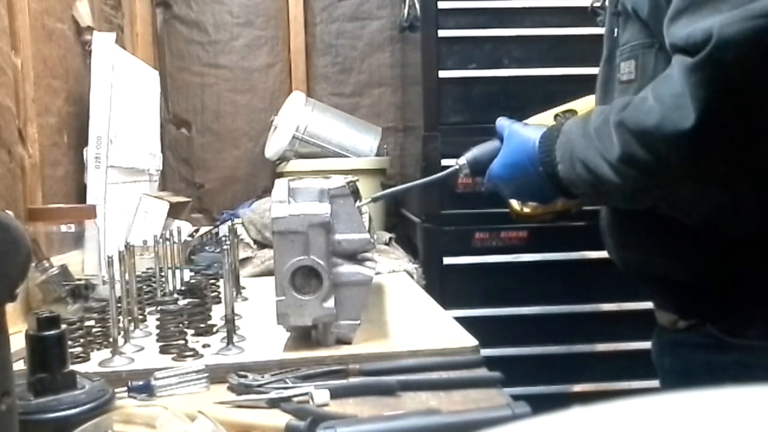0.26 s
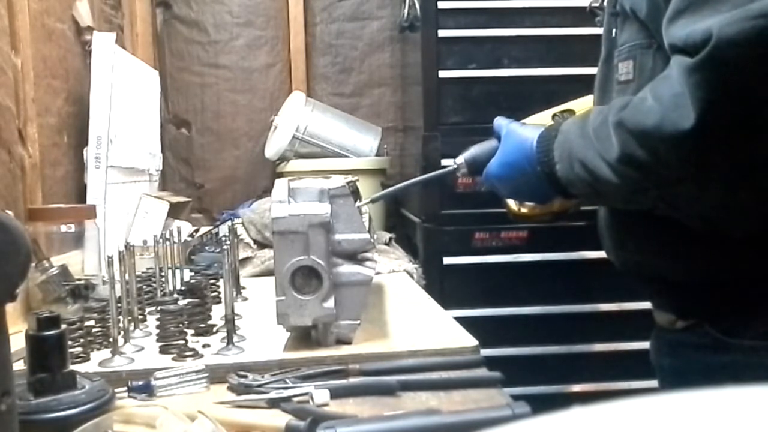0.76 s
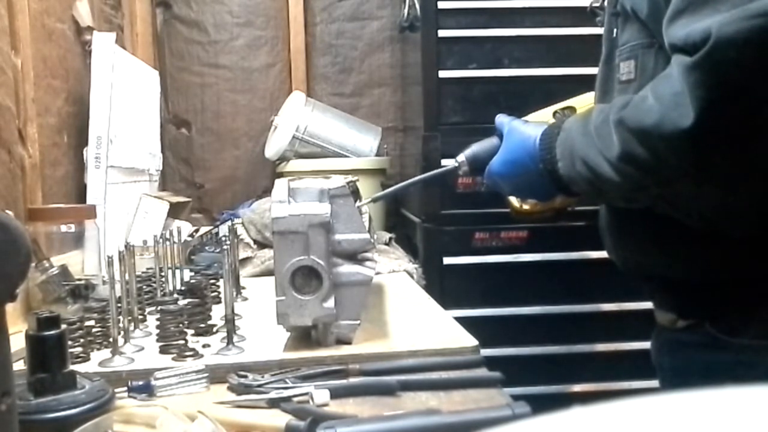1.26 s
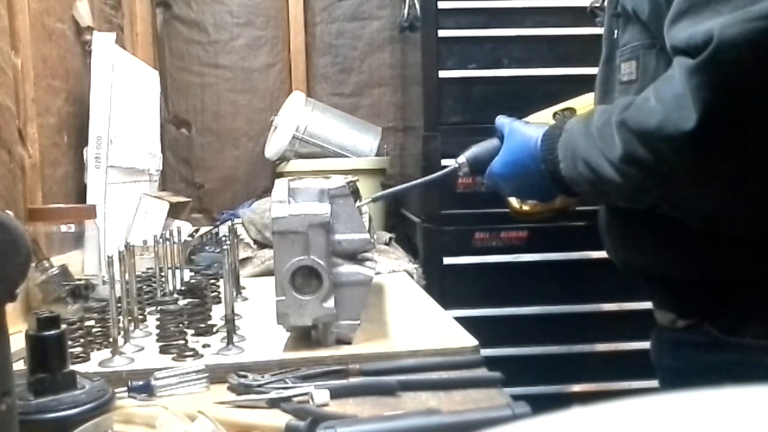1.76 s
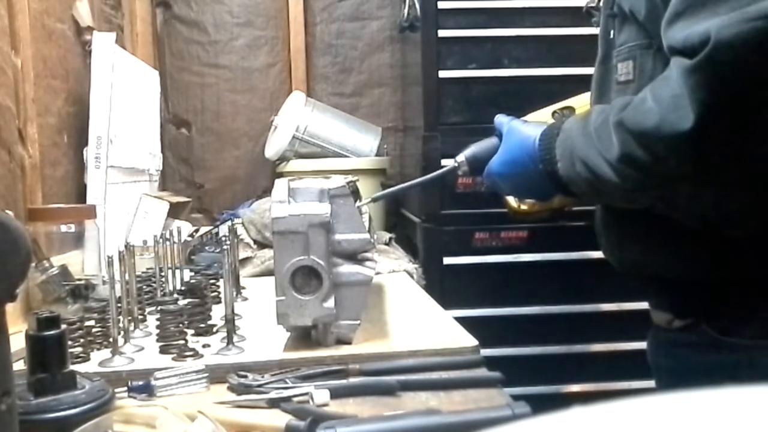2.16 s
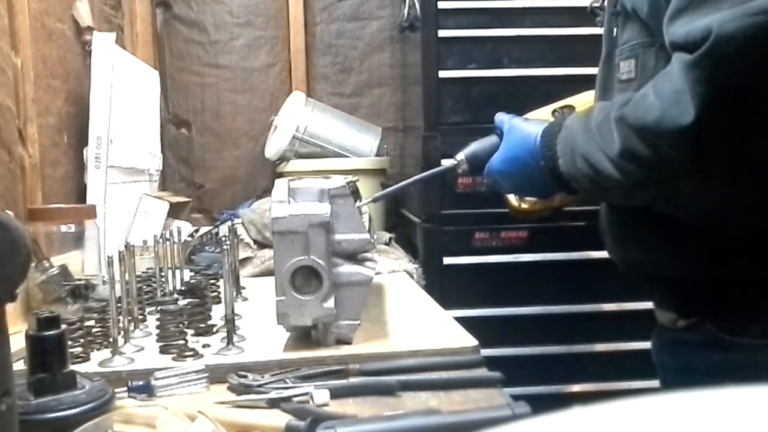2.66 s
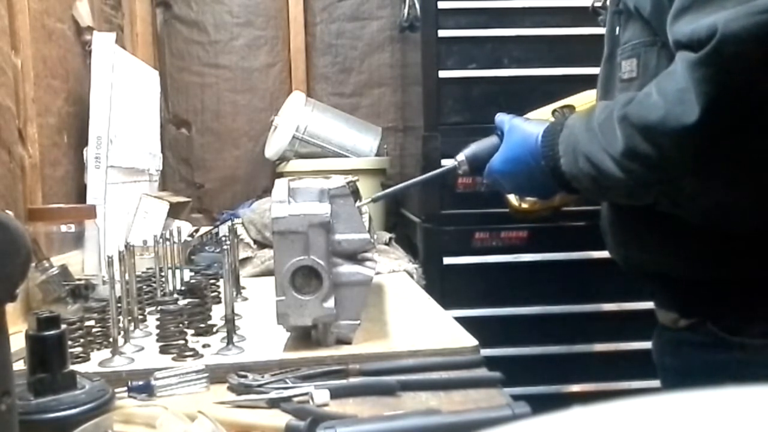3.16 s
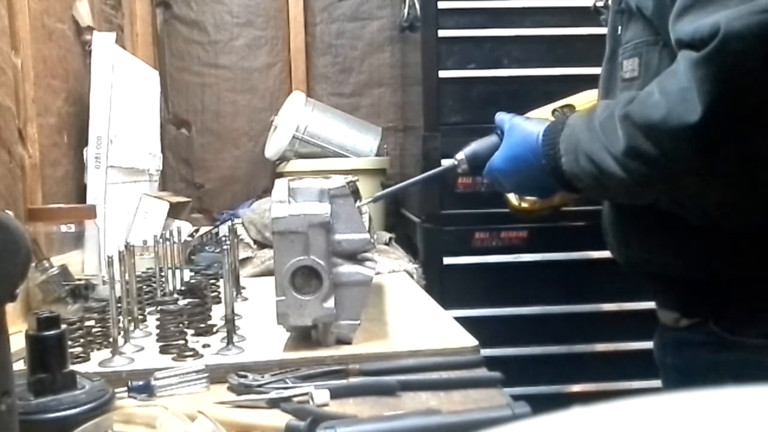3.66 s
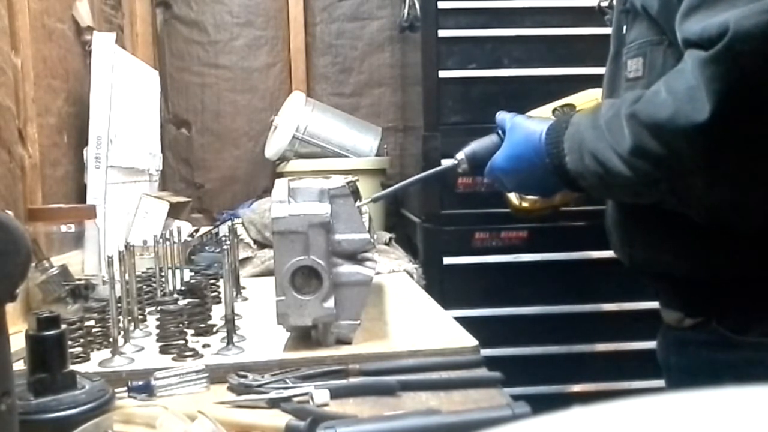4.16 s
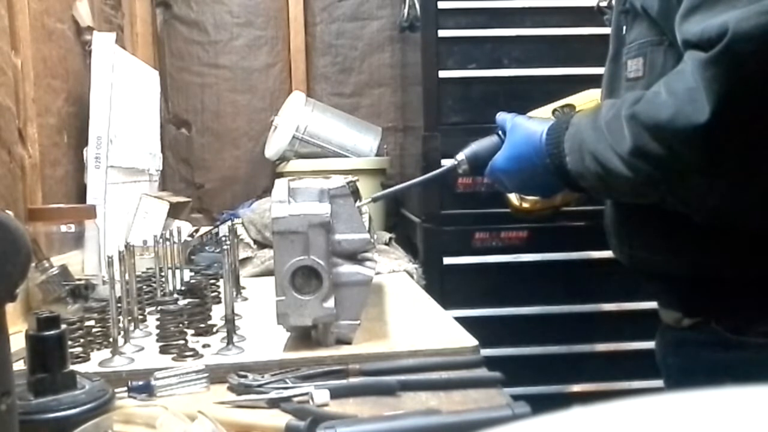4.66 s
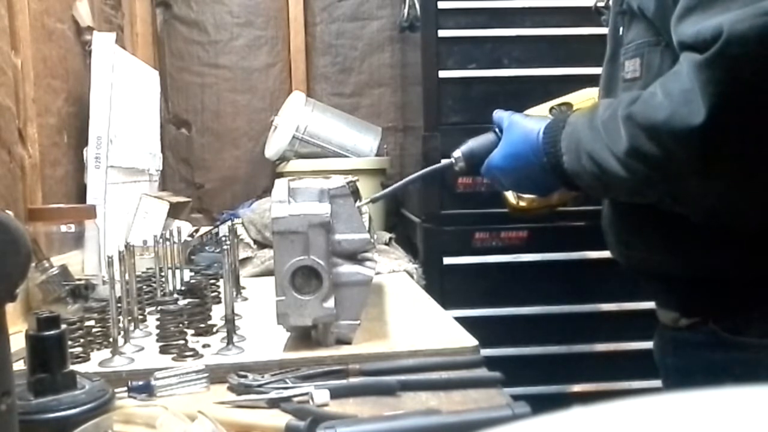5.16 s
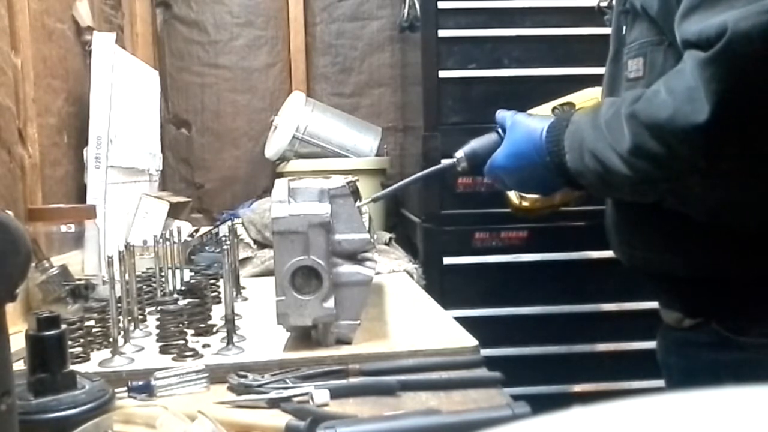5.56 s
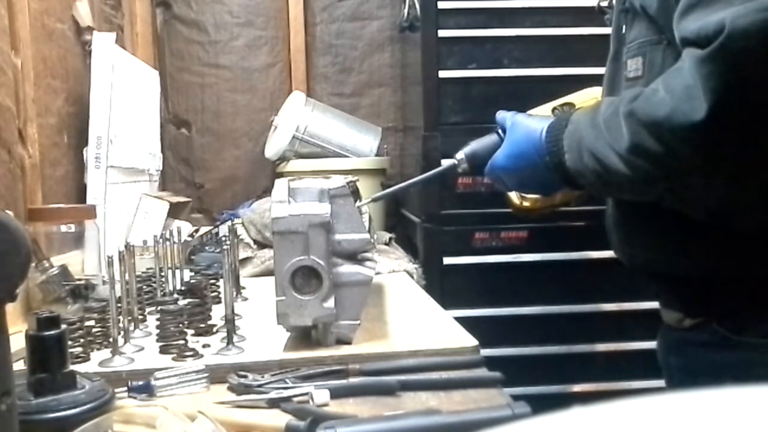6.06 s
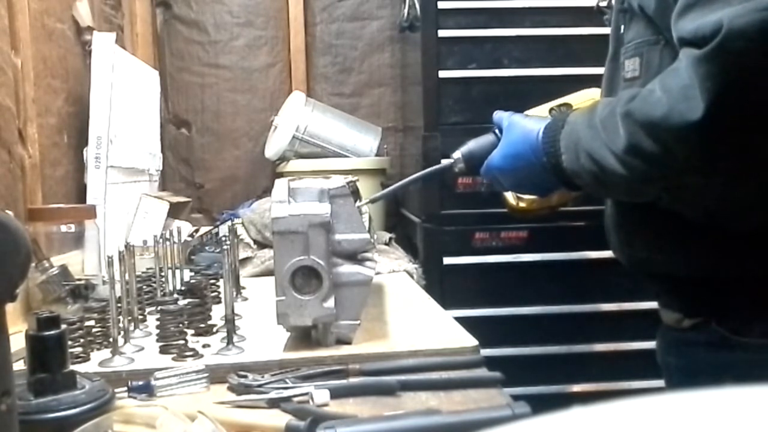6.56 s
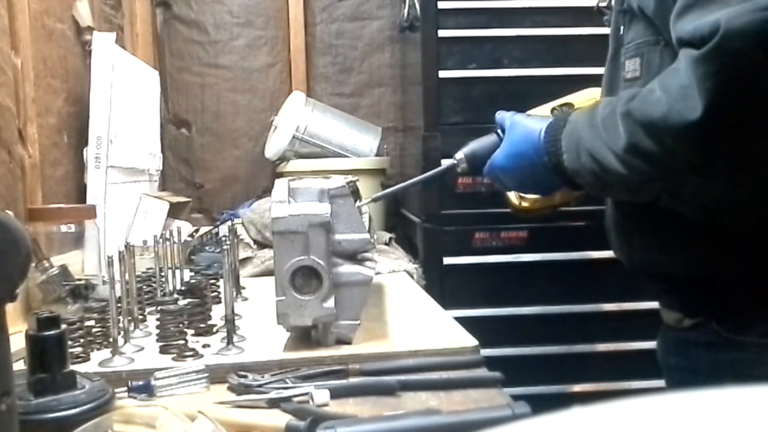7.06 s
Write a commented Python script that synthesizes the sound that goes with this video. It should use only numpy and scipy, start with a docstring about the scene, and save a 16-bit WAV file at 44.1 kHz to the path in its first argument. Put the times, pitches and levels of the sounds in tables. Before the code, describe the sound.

Close, continuous electric drill whine with dense gear rattle, and rhythmic gritty grinding of metal on metal swelling and easing in a small workshop.

```python
"""A drill's motor and gears whine over a dense rattle while grinding paste already bites, close by in a small workshop.
A cordless drill at part trigger spins an engine valve against its seat; its speed control sings near 4 kHz.
Again and again the valve is drawn onto the seat: random grit impacts drive the modes of valve and cylinder head.
Whines are sines locked to the motor's turns, the rattle is coloured impact noise; faint, soft low bumps lie underneath."""
import sys
import numpy as np
from scipy import signal
from scipy.fft import rfft, irfft
from scipy.io import wavfile
from scipy.ndimage import uniform_filter1d

SR = 44100
rng = np.random.default_rng(int(sys.argv[2]) if len(sys.argv) > 2 else 0)


def master(y):
    """Save y as 16-bit WAV."""
    cut = np.clip(np.atleast_2d(y).T, -1, 1)
    pcm = np.round(cut * 32767)  # scale
    wavfile.write(sys.argv[1], SR, pcm.astype(np.int16))


N = 322812
TIME = np.arange(N) / SR  # s
HZ = np.fft.rfftfreq(N, 1 / SR)
CRUISE = 260  # motor turns per second at which levels are quoted
FIRM_DB = -32  # bite that counts as firm

# the valve is drawn onto its seat: start t/s, length/s, bite level/dB, wear of the grit/(dB/s; negative firms the bite),
# extra ring of the valve's first mode level/dB, of its second mode level/dB
PRESSES = [(0.0, .62, -34, 1.5, 2, 0), (1.078, 0.96, -30.5, 6.5, 1, 1.5), (2.493, 0.7, -29, 8.5, 0, 2),
           (3.672, 1.05, -29, 8.5, 1, 1.5), (5.3, 0.99, -32.5, 4.5, 0, 3),
           (6.822, 0.43, -34.5, -5.5, -1, 4)]


def gain_of(db):
    """Decibels to amplitude."""
    return 10 ** (np.asarray(db) / 20)


def evened(x):
    """Scales to an rms of 1."""
    return x / np.sqrt(np.mean(x ** 2) + 1e-20)


def curves(rows):
    """Each column of a table, joined by straight lines over time."""
    s, *columns = np.transpose(rows)
    return [np.interp(TIME, s, column) for column in columns]


def swells(rows, width_s):
    """Each column of an event table as brief bell-shaped lifts in dB."""
    return sum(np.outer(lifts, np.exp(-((TIME - s) / width_s) ** 2)) for s, *lifts in rows)


def drift(rate_hz):
    """Slow random wandering of rms 1, mostly below rate_hz."""
    spectrum = rfft(rng.standard_normal(N))
    return evened(irfft(spectrum / (1 + (HZ / rate_hz) ** 4), N))


def coloured(x, points):
    """Gives x a spectrum; below the lowest point it falls away."""
    f, db = np.transpose(points)
    gain = gain_of(np.interp(np.log(HZ + 1), np.log(f), db))
    gain = gain * np.minimum(HZ / f[0], 1) ** 3
    return evened(irfft(rfft(x) * gain, N))


def ringing(x, modes):
    """Drives steep resonances with x, each at its own level."""
    spectrum = rfft(x)
    total = 0
    for hz, width, db in modes:
        response = 1 / (1 + 1.3j * (HZ - hz) / width) ** 2
        total = total + gain_of(db) * evened(irfft(spectrum * response, N))
    return evened(total)


def held(ring, share):
    """Friction damps a wide swing and feeds a weak one, which steadies the ring."""
    swing = np.sqrt(abs(uniform_filter1d(ring ** 2, size=1500)) + .02)
    return evened(ring / swing ** np.clip(share, 0, 1))


def grains(per_s, spread_db):
    """A random train of tiny impacts of uneven size."""
    size = gain_of(spread_db * np.minimum(rng.exponential(1, N), 4))
    strikes = rng.random(N) < per_s / SR
    return evened(size * rng.standard_normal(N) * strikes)


def tone(turns, db, waver_db, jitter):
    """A sine whose level (waver, dB rms) and phase (jitter, radians rms) tremble a little."""
    level = np.sqrt(2) * gain_of(db + waver_db * drift(8.5))
    return level * np.sin(2 * np.pi * (turns + rng.random()) + jitter * drift(58))


def bench():
    """A very faint, lumpy rumble of the bench under the work: low noise of wandering level."""
    # f/Hz, relative level/dB
    rumble = coloured(rng.standard_normal(N), [(30, -12), (70, -10), (140, -1), (200, -4), (400, -29)])
    return gain_of(-86.0) * rumble * gain_of(5.3 * drift(15))


def low_bumps(decay_s=0.01, rise_s=0.0093):
    """Faint low bumps: each is a short, soft-edged low sine."""
    # faint, soft low bumps: t/s, approximate peak level/dB, f/Hz
    bump_table = [(.14, -64, 130), (.55, -66, 151), (.85, -68.5, 110), (1.28, -66.5, 135), (1.72, -64, 116),
                  (1.78, -60, 145), (2.106, -63, 129), (2.36, -64, 135), (2.549, -54, 110), (2.57, -60, 55),
                  (2.599, -59, 118), (3.698, -54, 135), (3.724, -57, 61), (4.153, -58, 121),
                  (4.474, -61, 113), (4.661, -62, 121.2), (4.766, -64, 91.5), (5.003, -63, 108.6),
                  (5.43, -62, 156), (6.472, -60, 142)]
    out = np.zeros(N)
    for s, db, hz in bump_table:
        age = np.maximum(TIME - s, 0)
        envelope = (1 - np.exp(-age / rise_s)) ** 2 * np.exp(-age / decay_s)
        # 18.5 dB makes up for the peak that the soft envelope costs
        out += gain_of(db + 18.5) * envelope * np.sin(2 * np.pi * hz * age)
    return out


def speed_control(speed):
    """The chopped battery current makes the windings sing, clean and steady, at a pitch set by the speed."""
    # switching tone, broadly rising with the trigger: motor speed/(turns/s), f/Hz
    pitch_table = [(245, 4081), (247, 4085), (252, 4123), (260, 4144), (262, 4154), (266, 4212),
                   (272, 4210)]
    # t/s, level/dB
    level_table = [(0, -34), (.7, -33.5), (1.1, -35.5), (2.4, -39), (3.6, -34.5), (4.6, -37), (5.1, -33),
                   (5.7, -36), (6.0, -46), (7.32, -41)]
    sag_at_s, sag_length_s, sag_hz = 1.15, 0.0581, 54.9  # the pitch dips once, as the valve bites
    sag = sag_hz * (abs(TIME - sag_at_s) < sag_length_s / 2)
    hz = np.interp(speed, *np.transpose(pitch_table)) - sag
    return tone(np.cumsum(hz) / SR, curves(level_table)[0], waver_db=.4, jitter=.05)


def case_lift(hz):
    """How many dB the gear case adds to a whine as it slides over narrow resonances."""
    # resonances of the gear case: f/Hz, width/Hz
    peak_table = [(3108, 45), (3190, 45), (3280, 36), (3390, 70), (6425, 70), (7670, 70), (7835, 75),
                  (8000, 120), (9110, 110), (10240, 70)]
    # lift of each resonance: level/dB
    lift_table = [5.3, 7.5, 8, 2.1, 5.4, 7.1, 7.3, 3.1, 5.1, 7.8]
    return sum(db * np.exp(-(2 * (hz - centre) / width) ** 2)
               for (centre, width), db in zip(peak_table, lift_table))


def motor(speed, turns, grip):
    """Shaft and gear lines, all locked to the turning of the motor; load shifts the level of the strong ones."""
    # main whine, five to a turn of the motor: t/s, level/dB
    main_table = [(0, -37), (1.2, -37.5), (1.6, -36.5), (2.05, -41.5), (2.8, -40), (3.3, -38.5), (3.6, -44),
                  (4.1, -36.5), (5.3, -42.5), (5.7, -36), (6.1, -43), (6.45, -35.5), (7.32, -34.5)]
    # higher gear whines: f/(multiples of the motor's speed)
    whine_orders = [12, 88 / 7, 25, 30, 35, 40]
    # the same whines: base level at cruising speed/dB, gain per extra turn per second/dB, gain under a firm bite/dB
    whine_levels = [(-43, 0.05, -0.5), (-46, 0.48, 1.5), (-45.5, 0.53, 1), (-43.5, 0.56, 1),
                    (-45.5, 0.1, 1.5), (-49.5, 0.16, -2.5)]
    # whines flare up or fade for a moment: t/s, lift of the pair near 3 kHz level/dB,
    # of the pair at 6-8 kHz level/dB, of the pair at 9-11 kHz level/dB
    flare_table = [(1.55, 4, -1, 6), (2.0, -1, 1, 3), (2.45, 1, 0, 8), (3.35, 0, 0, 3),
                   (3.58, -3, -6, -3.5), (3.82, 3.5, 1, 0), (5.7, 2, 0.5, -3), (6.45, 0, -3, -2),
                   (6.8, 2, -3, 2)]
    # weaker lines of the shaft (whole orders) and of gears and bearings (others): f/(multiples of the motor's speed)
    weak_orders = [1, 1.37, 1.686, 2, 3, 6, 7, 11.43, 13.26, 13.57, 14.86, 15, 16.65, 17.14, 18.29, 24, 27,
                   29, 32, 33, 36, 37.71, 39, 41, 45, 60]
    # the same lines, relative to one another: level/dB
    weak_levels = [-54, -62.5, -58, -60.5, -54, -48, -68, -46, -46, -44, -70, -48, -43.5, -60, -58, -43.5,
                   -52, -54, -58, -54, -53, -59, -62, -58, -53, -56]

    main = tone(5 * turns, curves(main_table)[0], waver_db=0.5, jitter=0.13)
    load = np.minimum(grip / gain_of(FIRM_DB), 1)
    flares_db = np.repeat(swells(flare_table, width_s=0.18), 2, axis=0)
    strong = 0
    for order, (db, rise_db, load_db), flare_db in zip(whine_orders, whine_levels, flares_db):
        level_db = db + rise_db * (speed - CRUISE) + load_db * load
        level_db = level_db + case_lift(order * speed) + flare_db
        strong = strong + tone(order * turns, level_db, waver_db=1.5, jitter=0.1)
    weak = 0
    for order, db in zip(weak_orders, weak_levels):
        # short waves fade in and out most as the hand sways
        sway_db = 1.8 * min(order / 12, 1) * drift(1.2)
        weak = weak + tone(order * turns, db + sway_db, waver_db=2.2, jitter=0.22)
    return main + strong + gain_of(-3.5) * weak


def gears(speed, turns, grip):
    """Teeth and brushes tick densely, harder once in each turn of shaft and bearing cage, and shake the housing."""
    # colour of the rattle: f/Hz, relative level/dB
    colour_table = [(150, -33.5), (220, -22), (430, -15), (1000, -6), (2500, -5), (3400, -5), (4500, 1),
                    (5500, -4.5), (6500, -3), (8000, 0.5), (9300, -1.5), (11000, -6.5), (12000, -14.5),
                    (15500, -16.5)]
    # resonances of the drill's housing: f/Hz, width/Hz, relative level/dB
    housing_table = [(440, 50, -17), (930, 40, -11), (1814, 45, -8), (1940, 70, -11), (2620, 160, -7),
                     (2880, 120, -7), (3410, 70, -11), (3880, 130, -5), (4290, 110, -6), (4560, 280, 0),
                     (6480, 200, -5), (11020, 300, -13)]
    # the drill jolts in the hand and its gears rattle harder: t/s, lift level/dB
    jolt_table = [(1.62, 2), (2.68, 2), (2.88, 1.5), (3.16, 1.8), (3.8, 3), (5.03, 1.3), (5.65, 0),
                  (6.09, 1.5), (6.7, 2)]
    cage_order = .686  # bearing cage turns per motor turn
    cruise_db, per_turn_db, load_db = -26, 0.11, .5  # at cruise; per extra turn per second; at a firm bite

    shaft_beat = 0.067 * np.cos(2 * np.pi * turns)
    cage_beat = 0.02 * np.cos(2 * np.pi * cage_order * turns)
    ticks = grains(per_s=38000, spread_db=0.5) * (1 + shaft_beat + cage_beat) * gain_of(0.26 * drift(49))
    sound = coloured(ticks, colour_table) + gain_of(-16) * ringing(ticks, housing_table)
    level_db = cruise_db + per_turn_db * (speed - CRUISE) + load_db * grip / gain_of(FIRM_DB)
    level_db = level_db + swells(jolt_table, width_s=.05)[0]
    return gain_of(level_db + .5 * drift(8.3)) * sound


def bite():
    """How hard the paste bites: each press grips at once, changes as the grit wears, and lets go."""
    attack_s, let_go_s, loose_db = 0.024, 0.12, -54  # loose: the bite left while the valve spins free
    grip = gain_of(loose_db)
    for start, length, db, wear_db, *_ in PRESSES:
        age = np.maximum(TIME - start, 0)
        attack = np.minimum(age / attack_s, 1)
        release = np.exp(-np.maximum(age - length, 0) / let_go_s)
        grip = grip + attack * gain_of(db - wear_db * age) * release
    return grip * gain_of(0.9 * drift(7.6))


def seating():
    """Each press seats the valve a little differently, which favours one of its modes; in dB."""
    rows = np.array(PRESSES)
    latest = np.maximum(np.searchsorted(rows[:, 0], TIME) - 1, 0)
    return rows[latest, -2:].T


def lapping(valve_turns, grip):
    """Grit is crushed between valve and seat; valve and cylinder head ring under the scrape."""
    # modes of the cylinder head: f/Hz, width/Hz, relative level/dB
    head_table = [(940, 120, -13), (1040, 30, -3.5), (1069, 24, -1), (1094, 28, -4.5), (1275, 50, -15),
                  (1540, 40, -10), (1814, 35, -19)]
    # modes of the valve: f/Hz, width/Hz
    valve_table = [(2457, 30), (3194, 16), (5050, 22)]
    # each valve mode sings fully at a firm bite: level/dB, loss per dB of looser bite/dB
    sing_table = [(-36.5, 1.0), (-41, 0.3), (-42, .7)]
    # broad scrape of the grit: f/Hz, relative level/dB
    scrape_table = [(120, -28.5), (250, -15.5), (430, -10), (700, -1.5), (1050, -3), (1600, 5.5),
                    (2100, -5), (3000, 0.5), (4500, -5.5), (6000, -9.5), (10000, -7), (15000, -19.5)]
    # a coarse grain catches: t/s, lift of the grinding level/dB, of the valve's first mode level/dB,
    # of its second mode level/dB
    catch_table = [(.35, -2, 9, 0), (1.12, 2, -6, -2), (1.2, -0.5, 6, -2), (1.42, 4.5, 2, -2),
                   (1.54, 3, -6, 7), (2.7, 4, 5.5, 13), (2.8, 2.5, -10, 2), (2.91, 1, 9.5, -2),
                   (3.14, 2, -4, 0), (3.76, 4.5, -5, 4), (3.92, 3.5, 2, 9), (4.08, 3, -1, -4),
                   (5.61, 5, 0, 1), (6.12, -4.5, 6, 11), (6.96, 4.5, -7, -4), (7.26, 0, 12, 2)]

    catch_db, *rings_db = swells(catch_table, width_s=0.022)
    first_db, second_db = seating() + rings_db
    lifts_db = [first_db, second_db, (first_db + second_db) / 2]
    bite_db = 20 * np.log10(grip) + catch_db
    # the uneven seat catches four and six times in each turn of the valve
    chatter = 1 + .14 * np.cos(2 * np.pi * 4 * valve_turns) + .09 * np.cos(2 * np.pi * 6 * valve_turns)
    grit = grains(per_s=20000, spread_db=1.6) * gain_of(.5 * drift(30))

    head = gain_of(bite_db) * chatter * held(ringing(grit, head_table), share=0.43)
    scrape = coloured(grit * gain_of(0.72 * bite_db), scrape_table)
    valve = 0
    for (hz, width), (db, follow), lift_db in zip(valve_table, sing_table, lifts_db):
        level_db = db + follow * np.minimum(bite_db - FIRM_DB, 0) + lift_db
        mode = held(ringing(grit * chatter, [(hz, width, 0)]), share=0.24)
        valve = valve + gain_of(level_db) * mode
    return head + gain_of(-34) * scrape + valve


def workshop(x, t60_s, wet_db):
    """Dense short echoes from bench, tool chest and padded walls: sparse random taps that die away."""
    t = np.arange(SR // 3) / SR
    signs = rng.choice([-1., 1.], len(t))
    sparse = rng.random(len(t)) < 2000 / SR  # echoes per second
    taps = signs * sparse * (t > .003) * gain_of(-60 * t / t60_s)
    return x + gain_of(wet_db) * signal.fftconvolve(x, taps / np.linalg.norm(taps))[:N]


def scene():
    """Drill and valve stand straight ahead of the microphone, alike in both channels."""
    # the trigger is squeezed a little further twice, and the load sags the speed: t/s, motor speed/(turns/s)
    speed_table = [(0, 247), (0.3, 245.5), (0.7, 245.3), (1.15, 247.1), (1.3, 252.2), (1.55, 256.3),
                   (2, 258.4), (2.45, 260.9), (2.85, 258.7), (3.15, 259.2), (3.55, 261.7), (4, 260.1),
                   (4.75, 258.8), (5.2, 261.9), (5.55, 260.1), (5.9, 260.8), (6.05, 265.3), (6.45, 270.2),
                   (6.8, 272.2), (7.25, 270.2)]
    gear_ratio = 53.2  # motor turns per valve turn
    speed, grip = curves(speed_table)[0], bite()
    turns = np.cumsum(speed * (1 + 0.00041 * drift(13.2))) / SR

    rattle = gain_of(-1.0) * workshop(gears(speed, turns, grip), t60_s=0.12, wet_db=-9)
    grinding = workshop(lapping(turns / gear_ratio, grip), t60_s=0.23, wet_db=-16.5)
    # parts this small radiate almost no bass
    bass_cut = signal.butter(8, 170, "highpass", fs=SR, output="sos")
    small_parts = signal.sosfilt(bass_cut, rattle + grinding)
    centre = bench() + low_bumps() + speed_control(speed) + motor(speed, turns, grip) + small_parts
    return np.array([centre, centre])


def record(dry):
    """The microphone chain's upper band limit, a steep linear-phase low-pass."""
    edge_hz = 15750
    lowpass = signal.firwin(801, edge_hz, window=("kaiser", 9), fs=SR)
    return signal.oaconvolve(dry, lowpass[None], "same")


dry = scene()
out = record(dry)
master(out)
```